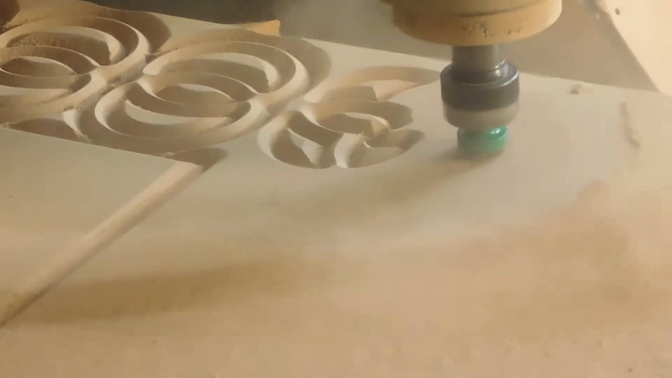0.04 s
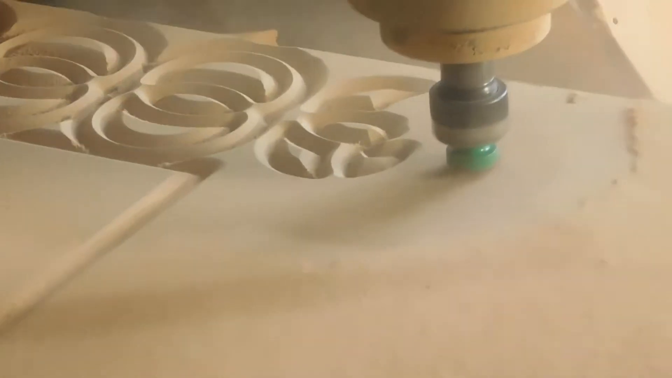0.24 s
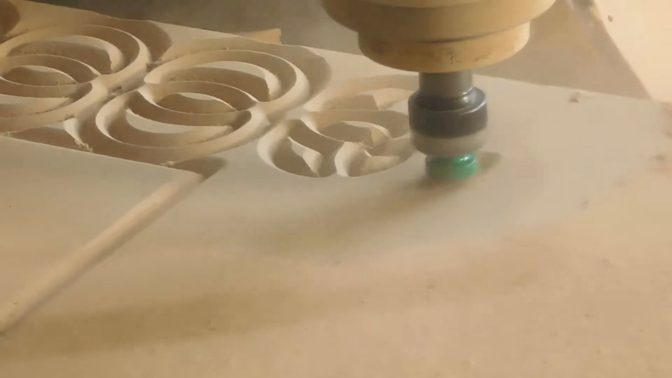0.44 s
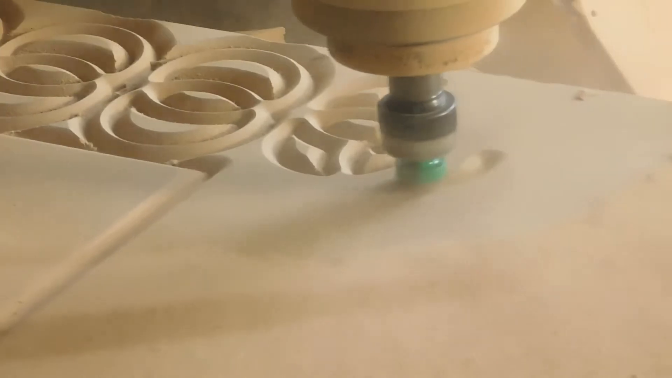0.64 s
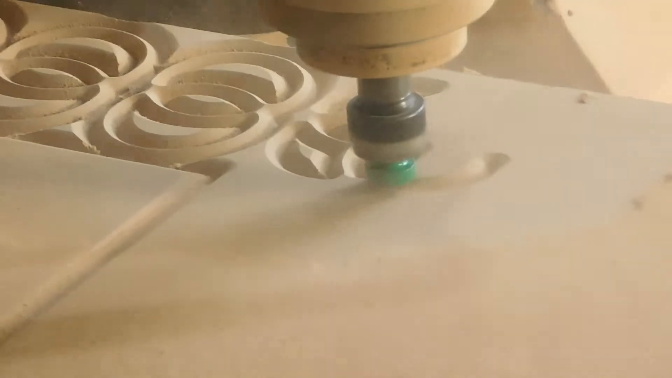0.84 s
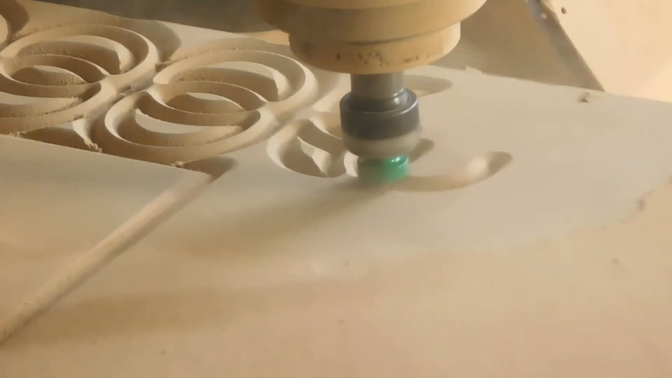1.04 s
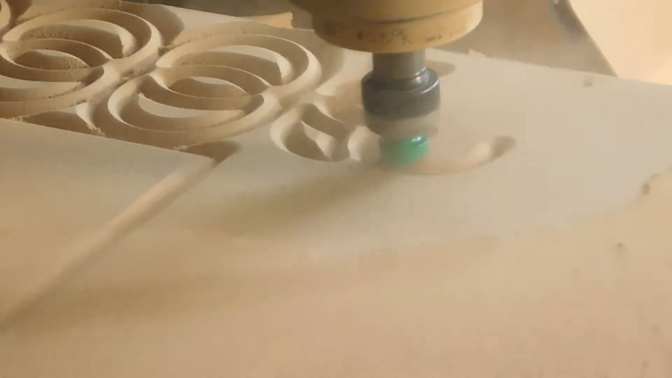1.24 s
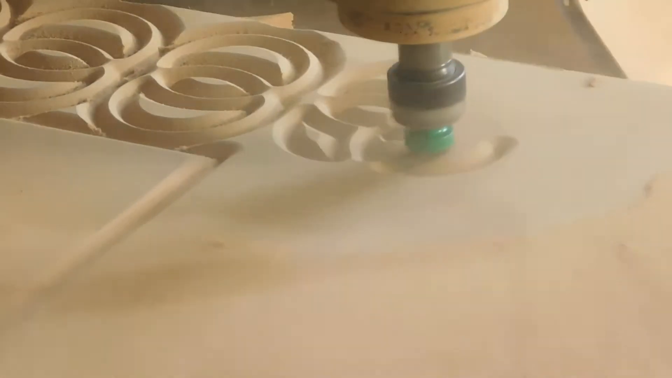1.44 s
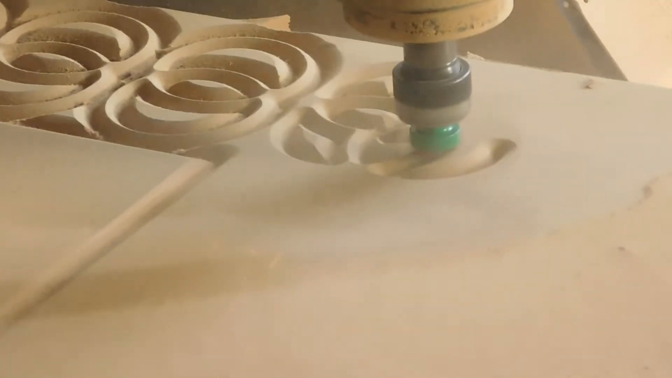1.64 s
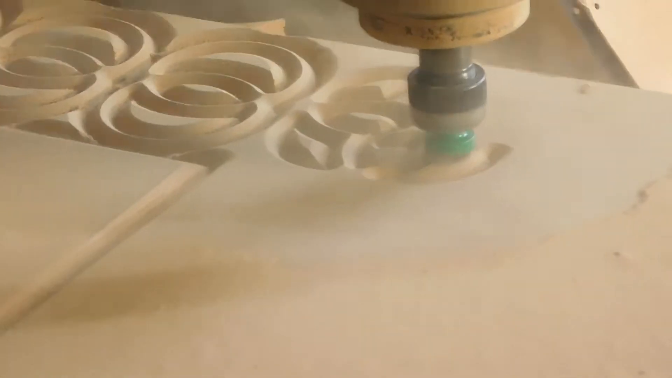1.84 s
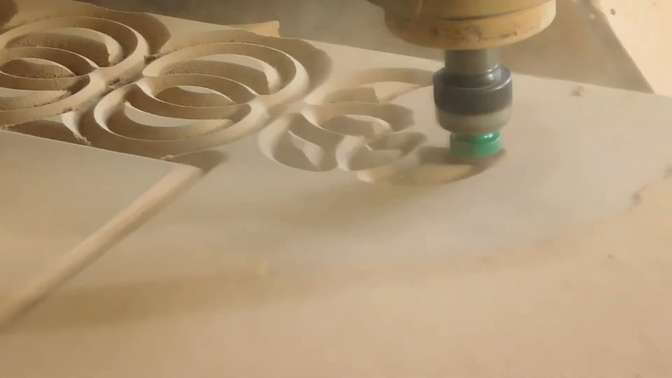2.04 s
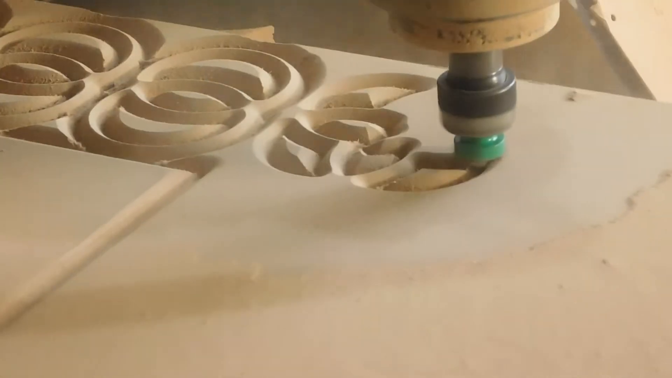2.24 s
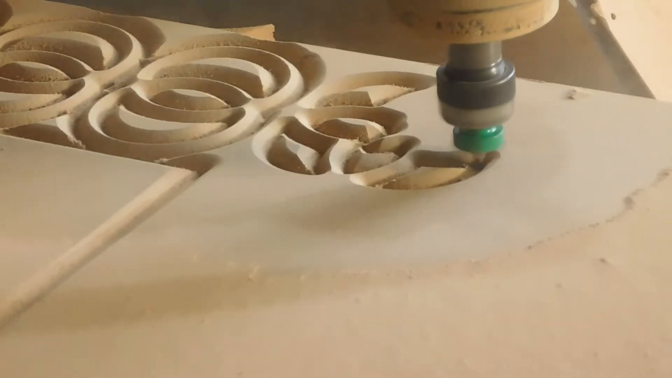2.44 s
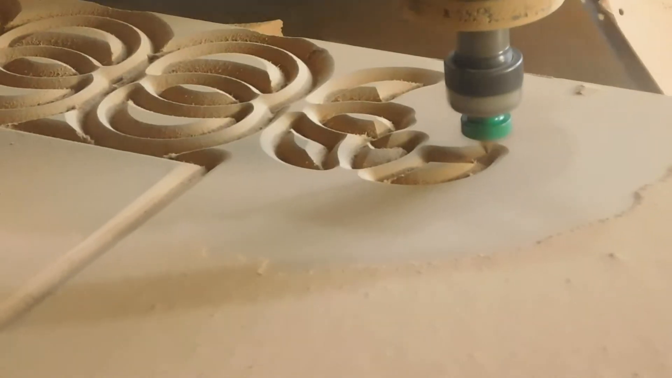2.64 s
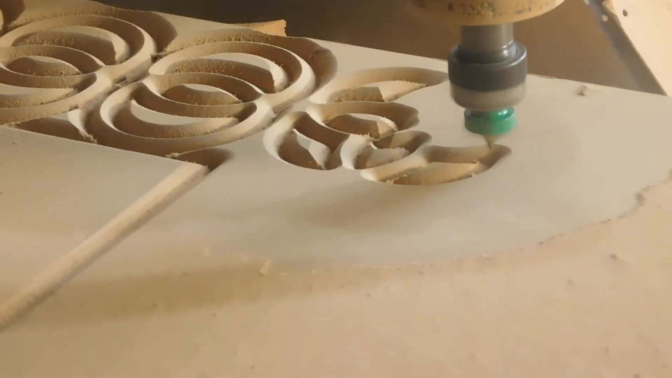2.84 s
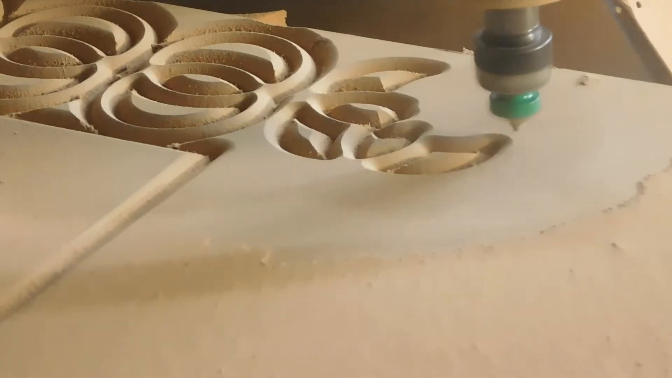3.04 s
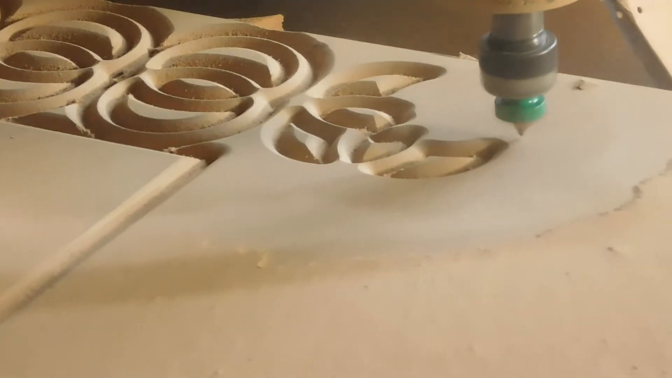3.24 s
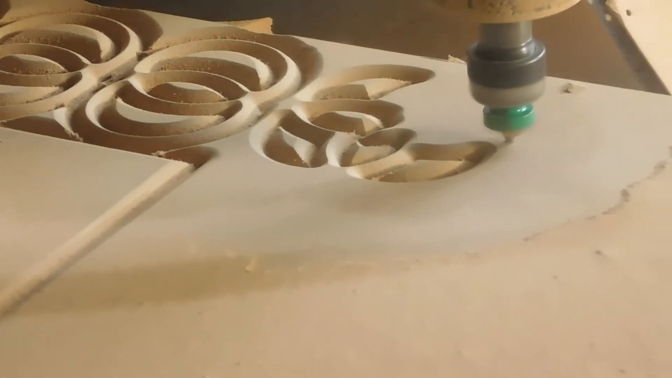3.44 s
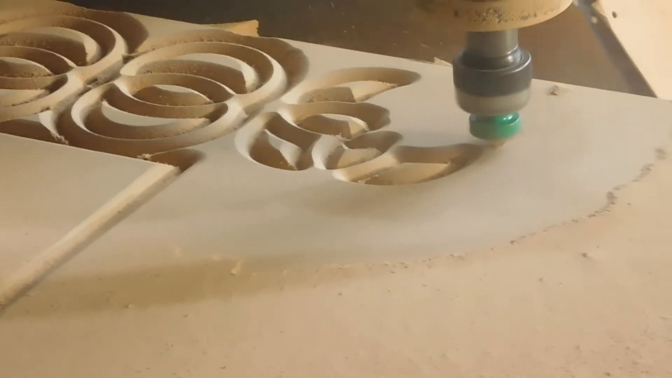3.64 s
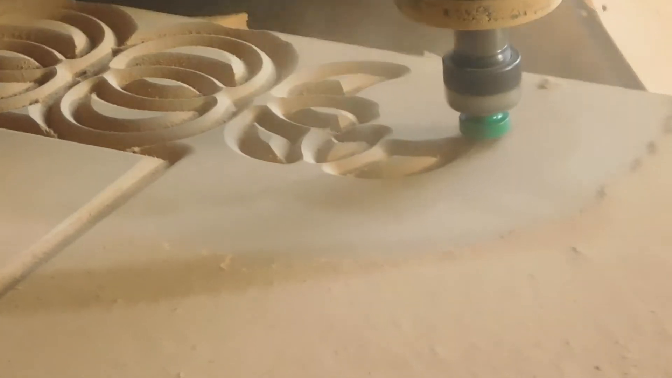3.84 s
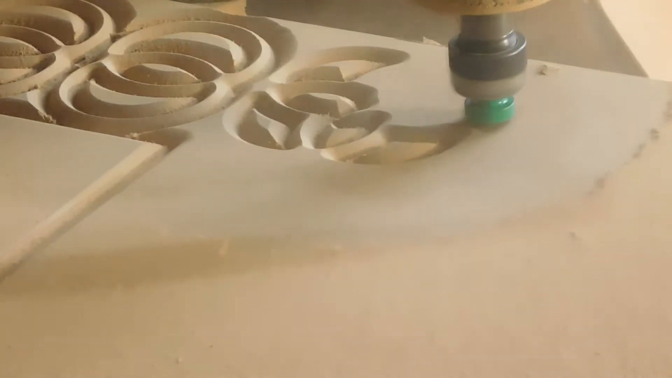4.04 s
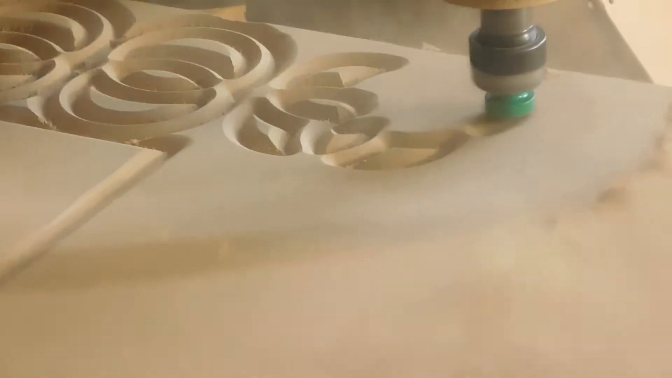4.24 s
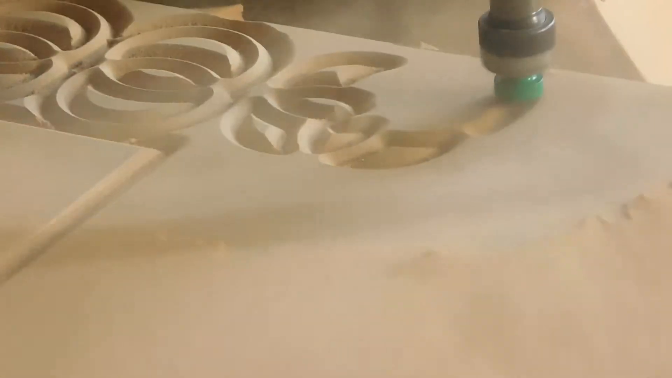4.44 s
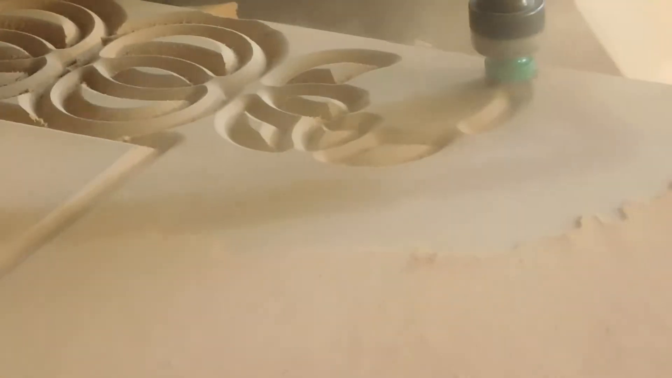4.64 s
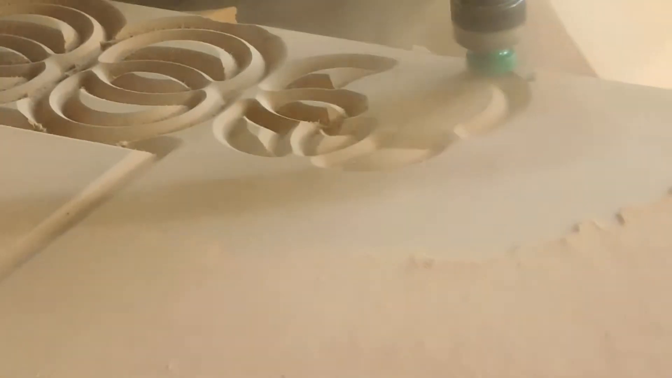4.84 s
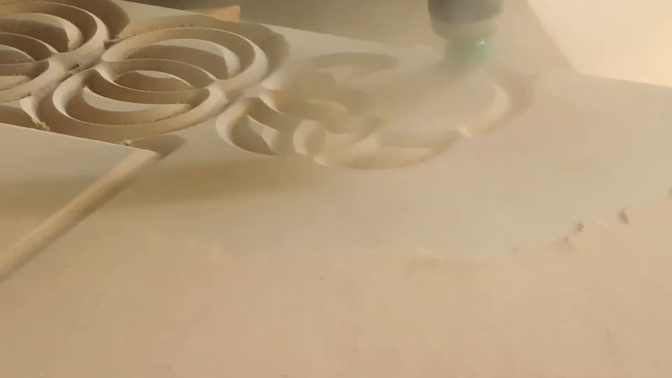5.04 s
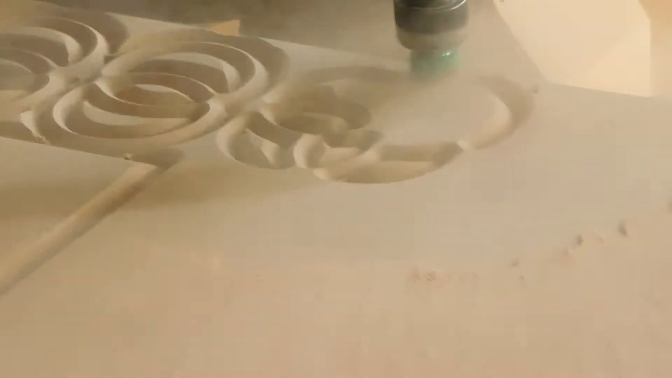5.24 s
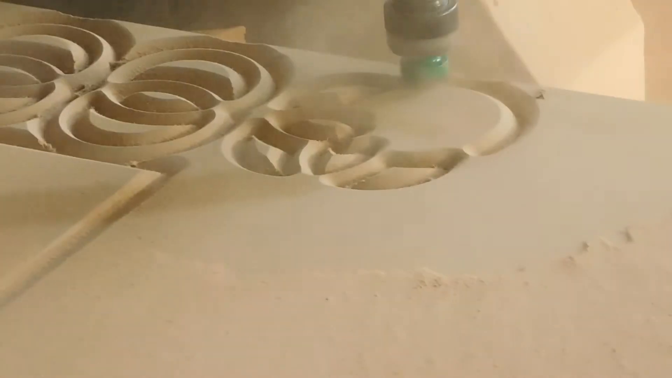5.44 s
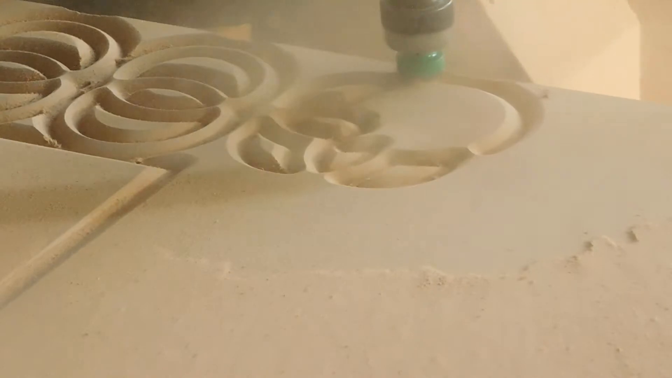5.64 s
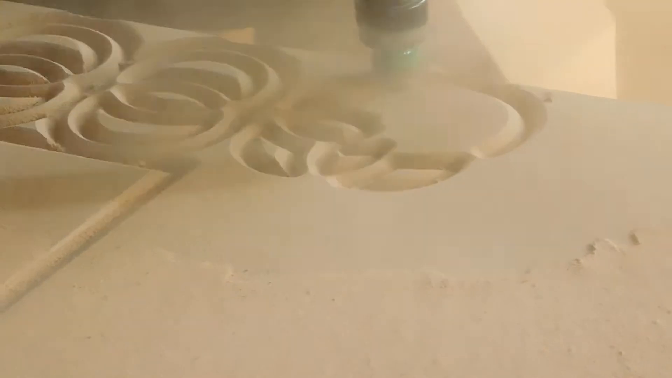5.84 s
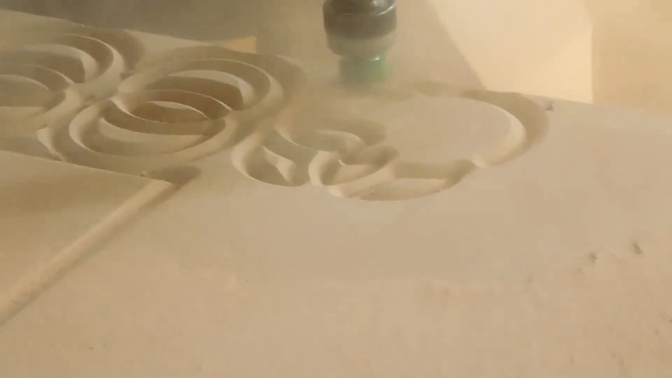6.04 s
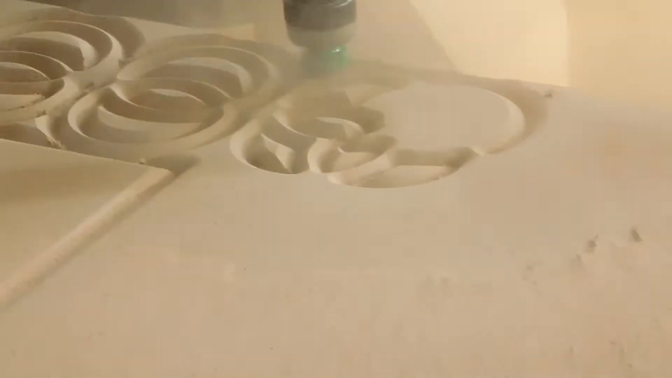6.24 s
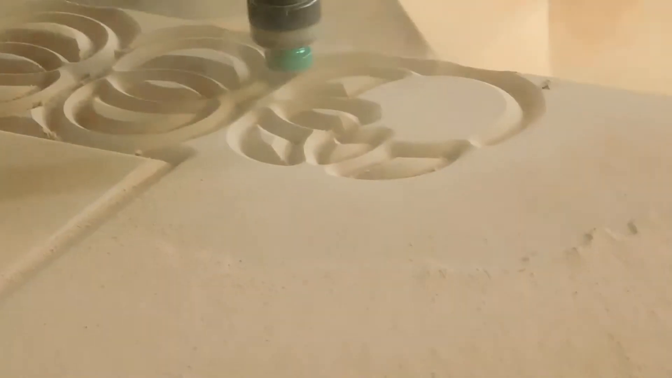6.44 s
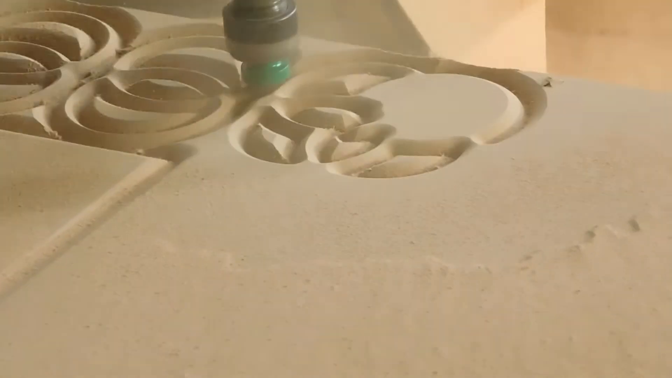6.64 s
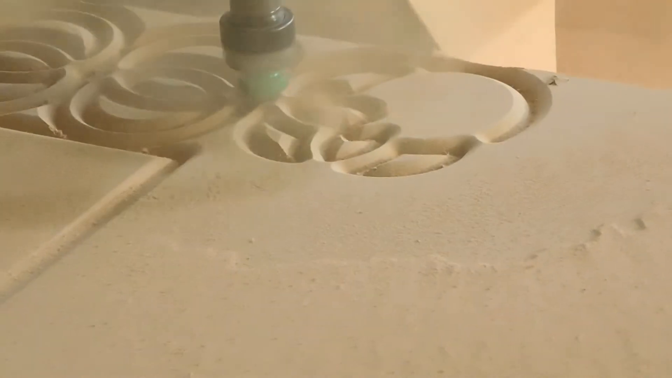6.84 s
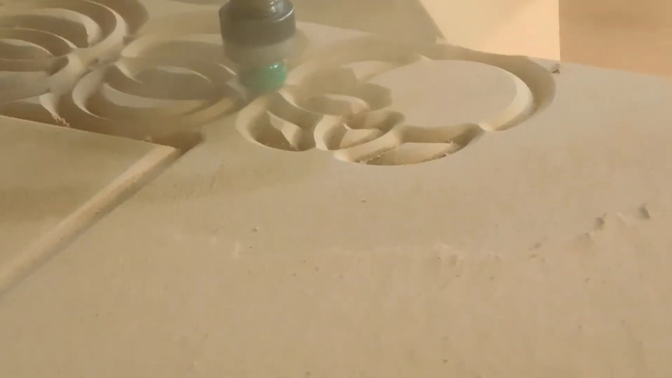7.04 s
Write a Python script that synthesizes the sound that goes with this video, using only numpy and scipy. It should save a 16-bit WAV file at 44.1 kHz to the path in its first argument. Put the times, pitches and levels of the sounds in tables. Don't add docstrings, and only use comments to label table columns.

```python
import sys
import numpy as np
from scipy import signal
from scipy.fft import rfft, irfft, next_fast_len
from scipy.io import wavfile
from scipy.ndimage import uniform_filter1d, map_coordinates

SR = 44100
rng = np.random.default_rng(int(sys.argv[2]) if len(sys.argv) > 2 else 0)


def transcribe(u):
    v = np.clip(np.atleast_2d(u).T, -1, 1)
    q = np.round(v * 32767).astype(np.int16)
    wavfile.write(sys.argv[1], SR, q)


def ratio(d):
    e = np.asarray(d, float) / 20
    return 10 ** e


N = 313110

# order [multiple of shaft speed], level [dB].
UPPER_ORDERS = [(13, -28), (14, -30.5), (15, -38), (16, -29.5), (17, -36), (18, -30), (19, -40.5),
                (20, -37), (21, -36), (22, -43), (23, -37.5), (24, -56), (26, -44), (27, -41.5), (28, -51),
                (29, -39), (30, -59), (31, -46), (32, -42), (33, -46), (34, -50)]
# frequency [Hz], left-right likeness [-1 to 1].
NEAR_LIKENESS = [(60, 0.29), (500, 0.13), (1500, 0.45), (4000, 0.12), (9000, 0.035)]
# time [s], level [dB under full load].
EFFORT = [(0.0, -12.5), (0.14, -8), (0.71, -2), (1.12, -10.5), (1.44, -1), (1.66, -14.5), (1.8, -2),
          (2.45, -23.5), (3.46, -13), (3.83, -12), (4.29, -2.5), (5.18, 0), (5.5, -8.5), (5.89, -0.5),
          (6.37, -3), (6.7, -9.5), (6.82, -7), (7.1, -10.5)]


def unit(x):
    return x / np.sqrt(np.mean(abs(x) ** 2) + 1e-20)


def along(points, hz):
    f, v = np.transpose(points)
    return np.interp(np.log(hz + 1), np.log(f + 1), v)


def curves(rows):
    s, *cols = np.transpose(rows)
    return [np.interp(np.arange(N) / SR, s, c) for c in cols]


def wobble(rate, channels=1):
    knots = rng.standard_normal((channels, 520))
    coarse = np.arange(0, N + 64, 64)
    smooth = [map_coordinates(k, [coarse * rate / SR]) for k in knots]
    return np.array([np.interp(np.arange(N), coarse, s) for s in smooth])


def tent(s, half):
    return np.clip(1 - abs(np.arange(N) / SR - s) / half, 0, 1)


def faded(rows):
    t = np.arange(N) / SR
    fade_s = .05
    return np.clip(np.minimum(t - rows[0][0] + fade_s, rows[-1][0] + fade_s - t) / fade_s, 0, 1)


def filtered(x, response):
    m = next_fast_len(N + 8192)
    return irfft(rfft(x, m) * response(np.fft.rfftfreq(m, 1 / SR)), m)[..., :N]


def narrow(shape):
    hz = np.fft.fftfreq(N, 1 / SR)
    gain = sum(ratio(db) / (1 + ((hz + below) / (width / 2)) ** 2) for below, width, db in shape)
    return unit(np.fft.ifft(gain * np.fft.fft(rng.standard_normal(N))))


def rush(gain, alike, patchy_db, gate=1):
    z = signal.stft(gate * rng.standard_normal((2, N)), nperseg=512)[2]
    field = uniform_filter1d(rng.standard_normal(z.shape[1:]), 6, 0)
    field = uniform_filter1d(field, 14, 1)
    pair = signal.istft(z * ratio(patchy_db * unit(field)), nperseg=512)[1][:, :N]

    def mid_side_gain(hz):
        turn = np.arccos(np.clip(along(alike, hz), -1, 1)) / 2
        return gain(hz) * [np.cos(turn), np.sin(turn)]

    mid, side = filtered(pair, mid_side_gain)
    return unit(np.array([mid + side, mid - side]))


def touch():
    t = np.arange(N) / SR
    clear_s, leave_s = 2.36, .16
    land_s, enter_s = 3.416, 0.48
    return np.clip(np.maximum((clear_s - t) / leave_s, (t - land_s) / enter_s), 0, 1)


def whine(spin):
    # time [s], flute tone level [dB].
    depth = [(0.0, -27), (0.055, -15), (0.07, -22), (0.092, -4.5), (1.98, -5), (2.07, -18), (2.245, -13),
             (2.4, -23.5), (2.95, -22.5), (3.49, -22.5), (3.62, -16), (3.89, -12), (3.951, -22),
             (3.98, -4.5), (7.1, -5.5)]
    # time [s], half width [s], change [dB].
    grooves = [(0.571, 0.17, -4), (.905, 0.12, -6), (1.15, 0.064, -22), (1.235, 0.068, -18),
               (1.54, 0.059, -3.5), (1.756, 0.094, -5), (2.15, .09, -6), (2.282, 0.031, -13),
               (2.355, 0.017, -15), (2.469, 0.017, -26), (2.634, 0.14, -11), (3.298, 0.17, -12),
               (3.58, 0.02, -13), (3.677, 0.041, -27), (3.816, 0.12, -7.5), (4.061, 0.067, -4),
               (4.32, 0.11, -4.5), (5.06, 0.44, -7), (5.37, 0.13, -2), (5.395, 0.06, -12),
               (5.65, 0.49, -4.5), (6.086, 0.1, -6), (6.421, 0.064, -8.5), (6.528, 0.048, -11),
               (6.642, 0.1, -14.5), (7.024, 0.12, -9.5)]
    # time [s], left over right [dB].
    pan = [(0.0, -1), (0.244, 4), (0.494, -6), (0.888, -3), (1.003, 5), (1.551, 4.5), (1.751, 0.3),
           (2.21, 4.5), (2.335, 2.5), (4.29, 0), (5.293, -2.5), (5.443, 1), (5.852, 0), (6.356, -0.5),
           (6.695, 3.5), (6.924, -1), (7.099, 4)]
    # time [s], half width [s], sharpening [dB].
    edges = [
        (0.02, 0.044, 15.5),
        (1.16, 0.12, 2),
        (1.72, 0.06, 9),
        (2.07, .1, 4),
        (3.9, 0.053, 10),
        (4.75, 0.11, 9),
        (5.56, 0.18, 7),
        (6.13, 0.21, 9),
    ]
    size = strengths()
    flute_db = curves(depth)[0] + sum(db * tent(s, half) for s, half, db in grooves)
    pan_db = curves(pan)[0]
    lag = 0.059 * np.outer([-1, 1], pan_db) + 0.23 * wobble(7, channels=2)
    level = ratio(flute_db + 0.13 * wobble(40) + np.outer([.5, -.5], pan_db))
    tone = level * np.exp(1j * (2 * spin + lag + 0.19 * wobble(33)))
    tone += size[1] * heard(1, spin, sway_db=1.0, apart=0.25)

    spin = spin + 0.045 * wobble(70)
    sharp_db = sum(db * tent(s, half) for s, half, db in edges) + 1.8 * wobble(3.7)
    for order in range(3, 13):
        tone += size[order] * ratio(0.031 * order * sharp_db) * heard(order, spin, sway_db=1.5, apart=1.0)
    bite = size[12] ** .6 * size[10] ** .4 * ratio(.7 * sharp_db)
    for order, db in UPPER_ORDERS:
        tone += bite * ratio(db + 22.5) * heard(order, spin, sway_db=3.0, apart=1.4)
    return np.sqrt(2) * tone.real


def strengths():
    # order, level [dB].
    resting = [(1, -38.5), (3, -32.5), (4, -27), (5, -35), (6, -31), (7, -36), (8, -34), (9, -38.5),
               (10, -34.5), (11, -34.5), (12, -38)]
    # peak time [s], length [s], order, level [dB].
    flares = [(0.017, 0.19, 1, -19.5), (0.313, 0.68, 3, -33), (0.36, 0.2, 5, -38), (0.48, 1.04, 1, -25),
              (0.6, 0.89, 9, -30.5), (0.76, 1, 7, -44), (0.9, 0.25, 5, -38), (1.04, 0.54, 3, -30),
              (1.294, 1, 1, -37), (1.5, 1.2, 11, -41), (1.93, .75, 5, -39), (2.003, 0.29, 7, -30),
              (2.115, 0.28, 3, -31), (2.45, 1.14, 1, -32), (3.114, 1.1, 1, -32.5), (3.634, 1.5, 3, -39),
              (3.72, 0.98, 1, -23.5), (4.12, 0.26, 7, -29), (4.3, 1.5, 1, -32), (4.41, 0.44, 3, -24.5),
              (5.013, 0.71, 1, -35.5), (5.04, 0.69, 7, -27), (6.35, 0.38, 5, -33),
              (6.394, 0.57, 1, -26.5), (6.506, 0.13, 3, -29), (6.5, 0.63, 7, -36),
              (6.92, 0.76, 3, -22.5), (7.0, 0.34, 7, -27.5), (7.082, 0.8, 1, -23),
              (0.28, 0.57, 6, -22.5), (0.42, .5, 4, -22.5), (0.586, 0.82, 10, -30),
                   (0.798, 0.95, 4, -20.5), (1.104, 0.62, 10, -26.5), (1.178, 0.17, 8, -25.5),
                   (1.184, 0.21, 6, -26.5), (1.203, 0.53, 4, -26), (1.196, 0.24, 12, -36),
                   (1.666, 1, 4, -25), (1.72, 0.91, 12, -39.5), (2.074, 0.26, 8, -23.5),
                   (2.08, 0.4, 6, -22), (3.891, 0.16, 4, -21), (3.915, 0.21, 6, -33), (3.925, 0.14, 8, -34),
                   (3.935, 0.38, 10, -37), (4.29, 0.32, 6, -21), (4.3, .55, 8, -27.5),
                   (4.48, 0.73, 4, -24.5), (4.9, 0.27, 12, -33), (4.94, 0.79, 8, -31),
                   (5.182, 0.85, 6, -29), (5.51, 0.59, 8, -29.5), (6.06, 0.48, 6, -19),
                   (6.326, 1, 8, -35.5), (6.538, 0.24, 4, -25), (6.552, 0.18, 6, -20),
                   (6.729, 0.14, 4, -11.5), (7.08, 0.097, 4, -20)]
    size = {round(order): ratio(db) * (touch() if order > 1.5 else 1) for order, db in resting}
    for s, length, order, db in flares:
        swell = np.sin(np.pi / 2 * tent(s, length / 2)) ** 1.26
        size[round(order)] = size[round(order)] + ratio(db) * swell
    return size


def heard(order, spin, sway_db, apart):
    drift = wobble(5 + 0.258 * order) + apart * 1.32 * np.tanh(wobble(3, channels=2))
    size = ratio(sway_db * (0.67 * wobble(9) + 1.5 * wobble(35) + apart * wobble(6, channels=2)))
    return unit(size) * np.exp(1j * (order * spin + .5 * drift + rng.uniform(0, 2 * np.pi)))


def chatter(spin):
    # distance under the order [Hz], width [Hz], level [dB].
    beat_shape = [(35, 79, 18.5), (84, 250, -13), (-26, 230, 5)]
    # order, chatter level [dB].
    beaten = [(1, -21.5), (2, 1), (3, -8.5), (4, 1), (5, -13), (6, -4), (7, -9), (8, -6.5), (10, -6),
              (12, -8), (14, -16.5)]
    # frequency [Hz], density [dB per Hz].
    shake_tone = [(12, -30), (22, -6.5), (45, -5.5), (160, -11.5), (350, -8.5), (700, -23), (1200, -64)]
    effort_db, = curves(EFFORT)
    beats = [narrow(beat_shape) for _ in range(9)]
    haze = [(order, db + 11.0) for order, db in UPPER_ORDERS if order > 14]
    out = np.zeros((2, N))
    for k, (order, db) in enumerate(beaten + haze):
        share = np.clip(0.15 * order, 0, 1)
        pair = beats[k % 9] + share * np.outer([1, -1], beats[(k + 4) % 9])
        out += ratio(db) * np.real(unit(pair) * np.exp(1j * order * spin))
    shake = rush(lambda f: ratio(along(shake_tone, f)), NEAR_LIKENESS, patchy_db=1.0)
    shake_db = -30.5 + 0.82 * effort_db - 26 * (1 - touch())
    return ratio(-17.5 + effort_db + wobble(12)) * out + ratio(shake_db) * shake


def chips(spin):
    # frequency [Hz], density [dB per Hz].
    hiss_tone = [(300, -39.5), (600, -16.5), (1000, -16), (2000, -21.5), (3500, -20), (6000, -31),
                 (10000, -36), (15500, -36.5)]
    puffs = np.exp(.25 * np.cos(spin) + .3 * np.cos(2 * spin))
    dust_db = -30
    flow = ratio(-24 + 0.86 * curves(EFFORT)[0]) + ratio(dust_db)
    hiss = ratio(0.4 * wobble(7)) * rush(lambda f: ratio(along(hiss_tone, f)), NEAR_LIKENESS, patchy_db=3.5, gate=puffs)
    return flow * hiss


def board():
    # time [s], level [dB].
    rattles = [
        [(0, -23), (.07, -22)],
        [(2.1, -30), (2.3, -31)],
        [(3.52, -32), (3.75, -27), (3.93, -26)],
    ]
    ring = np.sqrt(2) * narrow([(-765, 7, 0)]).real
    return ring * sum(faded(rows) * ratio(curves(rows)[0]) for rows in rattles)


def workshop(spin):
    # frequency [Hz], width [Hz], level [dB].
    machines = [(158, 14, 4), (270, 16, 3), (320, 16, 5), (453, 16, 7), (522, 20, 1)]
    # frequency [Hz], density [dB per Hz].
    roar_tone = [(24, -40), (45, -25), (80, -17), (150, -18), (250, -15), (450, -8.5), (900, -11.5),
                 (1700, -11), (3500, -18), (5000, -50), (7700, -120)]
    # frequency [Hz], density [dB per Hz].
    air_tone = [(1200, -53), (2200, 2), (4000, -1), (7000, -4), (10000, -5), (12500, -9.5), (14000, -17),
                (15700, -10)]
    # frequency [Hz], left-right likeness [-1 to 1].
    far_likeness = [(60, 1), (300, 0.99), (640, 1), (1400, 0.85), (2200, -0.069), (3100, -0.95),
                    (7000, -0.14)]
    # order, level [dB].
    slots = [(16, -45.5), (17, -54.5)]
    # time [s], pitch [Hz], level [dB].
    songs = [
        [(2.0, 12850, -53), (2.26, 12650, -49), (2.46, 12790, -45), (2.82, 12280, -45), (3.05, 12620, -46),
         (3.4, 12930, -44), (3.8, 12630, -47), (4.1, 12600, -52)],
        [(4.6, 12450, -54), (5.2, 12520, -52), (5.45, 12630, -48), (5.9, 12900, -55)],
        [(6.3, 12800, -54), (6.6, 12900, -49), (6.9, 12950, -47), (7.1, 12965, -46)],
        [(2.35, 692, -40), (2.6, 688, -38), (2.85, 690, -40)],
    ]
    lifted = 1 - touch()
    roar_db = -31 + 5.5 * lifted
    air_db = -30.5 + 3.5 * lifted + 3.5 * tent(2.7, 0.38)

    def hums(f):
        return sum(ratio(db) / (1 + ((f - hz) / (width / 2)) ** 2) for hz, width, db in machines)

    roar = rush(lambda f: ratio(along(roar_tone, f)) * (1 + hums(f)), far_likeness, patchy_db=-1.5)
    air = rush(lambda f: ratio(along(air_tone, f)), far_likeness, patchy_db=.6)
    ball_passes = 4.2
    lines = steady(ball_passes * spin, -42.5 + 6.5 * lifted, sway_db=-1.0, blur=0.36)
    lines = lines + sum(whistle(rows) for rows in songs)
    lines += sum(steady(order * spin, db, sway_db=1, blur=0.42) for order, db in slots)
    return ratio(roar_db + 0.09 * wobble(18.0)) * roar + ratio(air_db + 0.39 * wobble(8)) * air + lines


def whistle(rows):
    hz, db = curves(rows)
    phase = 2 * np.pi * np.cumsum(uniform_filter1d(hz, 3000)) / SR
    return faded(rows) * steady(phase, db, sway_db=3, blur=.45)


def steady(phase, db, sway_db, blur):
    phase = phase + blur * wobble(25) + .4 * wobble(3, channels=2)
    return np.sqrt(2) * ratio(db + sway_db * wobble(15, channels=2)) * np.sin(phase)


def scene():
    # time [s], speed [turns per s].
    speed = [(0.0, 394.8), (0.43, 393.0), (0.76, 392.2), (1.12, 396.6), (1.42, 393.7), (1.9, 395.9),
             (2.14, 398.4), (2.65, 399.7), (3.4, 399.6), (3.95, 395.0), (4.38, 391.9), (5.25, 393.2),
             (5.55, 395.7), (5.88, 393.9), (6.28, 393.0), (6.57, 399.3), (6.87, 396.8), (7.1, 397.5)]
    spin = 2 * np.pi * np.cumsum(curves(speed)[0]) / SR
    layers = whine(spin) + chatter(spin) + chips(spin) + board() + workshop(spin)
    return layers * ratio([[.4], [-.4]])


def roll_off(x):
    return signal.sosfilt(signal.butter(12, 15690, fs=SR, output="sos"), x)


def record(dry):
    ceiling = .81
    soft = dry / (1 + abs(dry / ceiling) ** 6) ** (1 / 6)
    return roll_off(filtered(soft, lambda f: f / (f + 6)))


dry = scene()
out = record(dry)
transcribe(out)
```